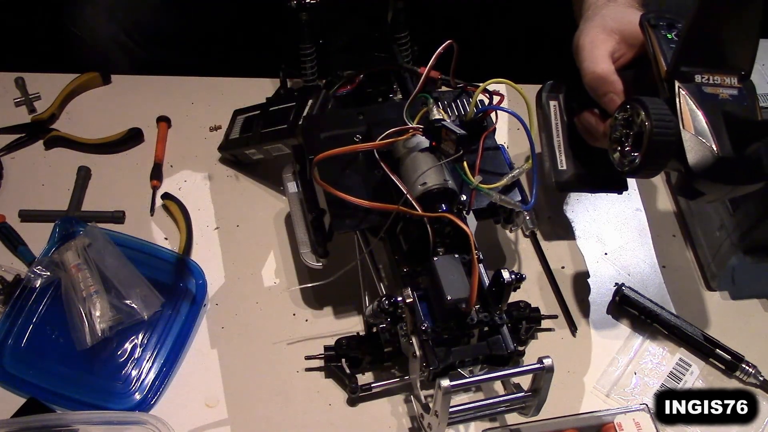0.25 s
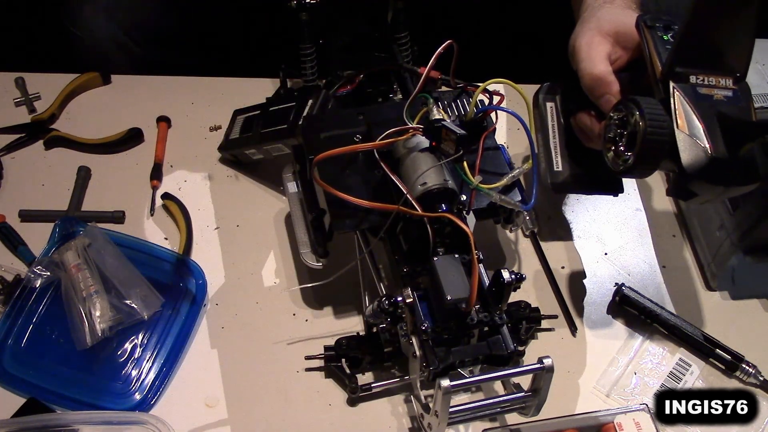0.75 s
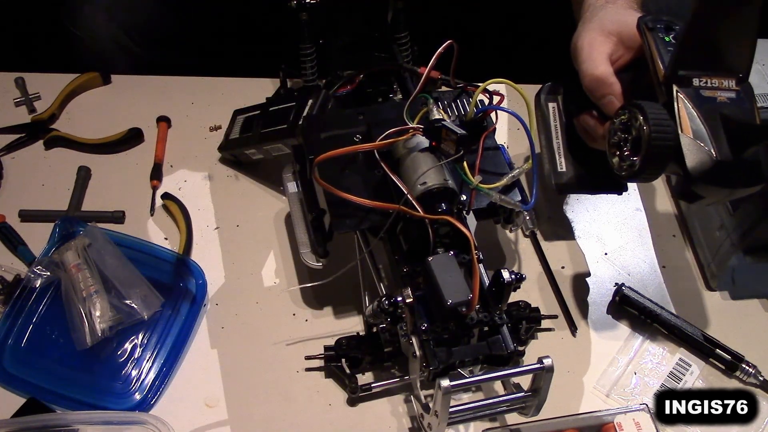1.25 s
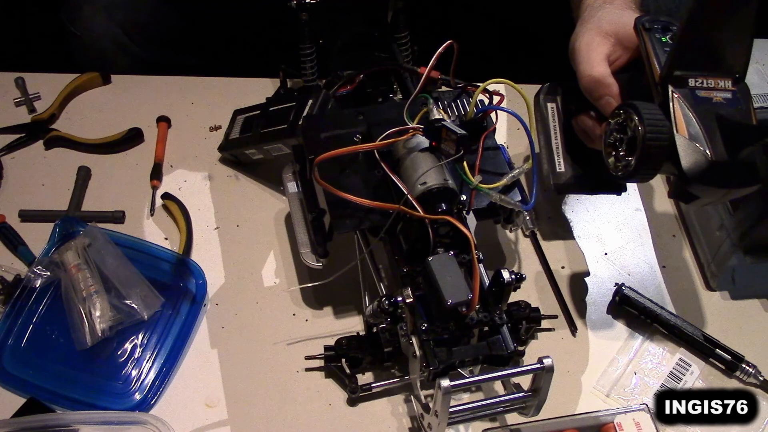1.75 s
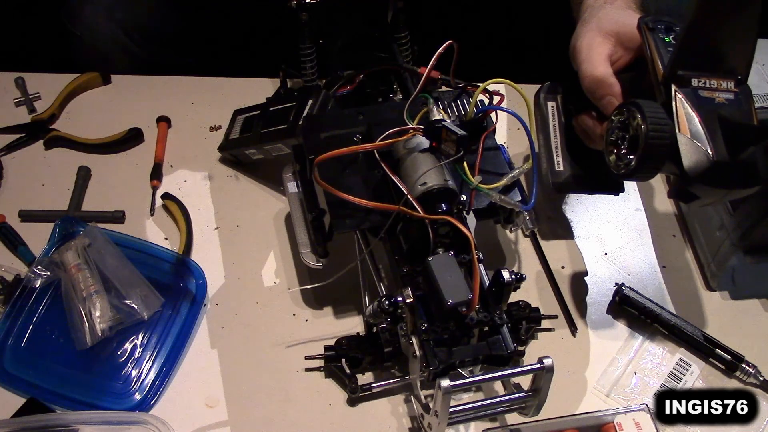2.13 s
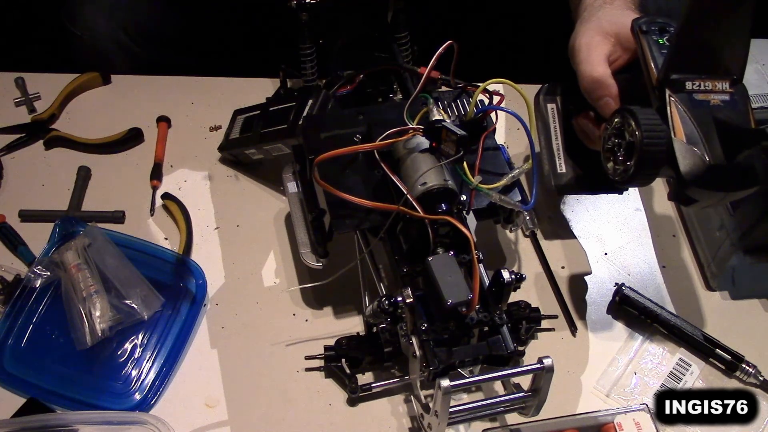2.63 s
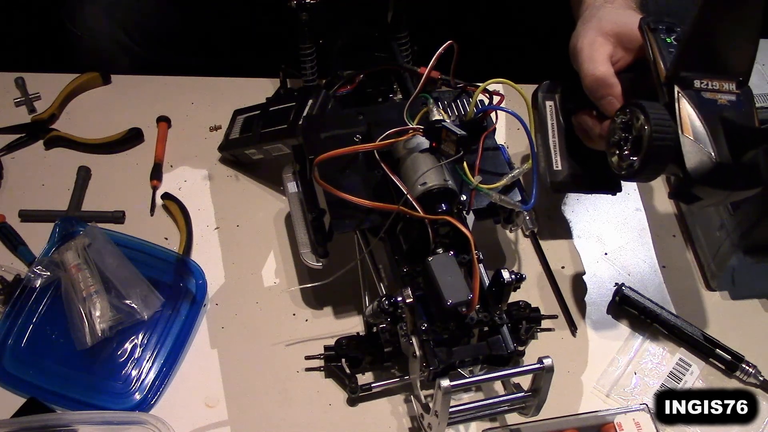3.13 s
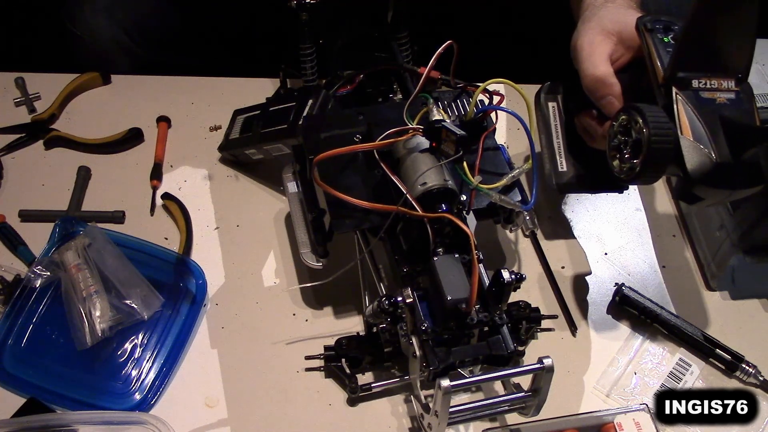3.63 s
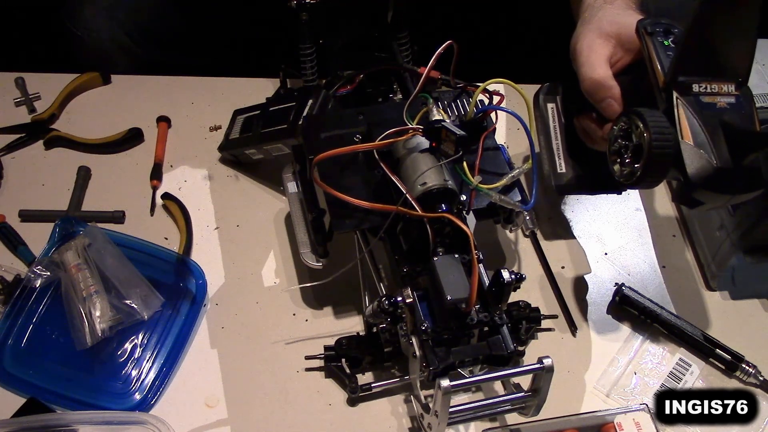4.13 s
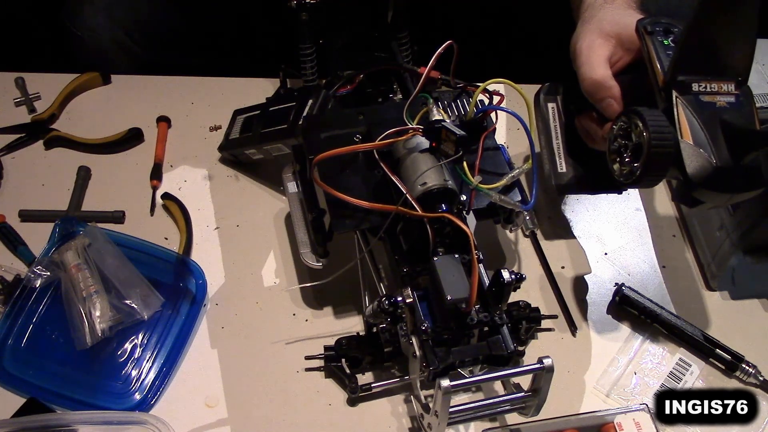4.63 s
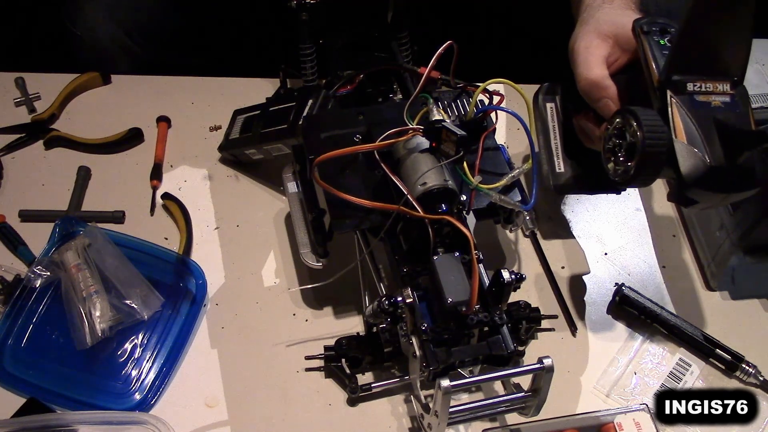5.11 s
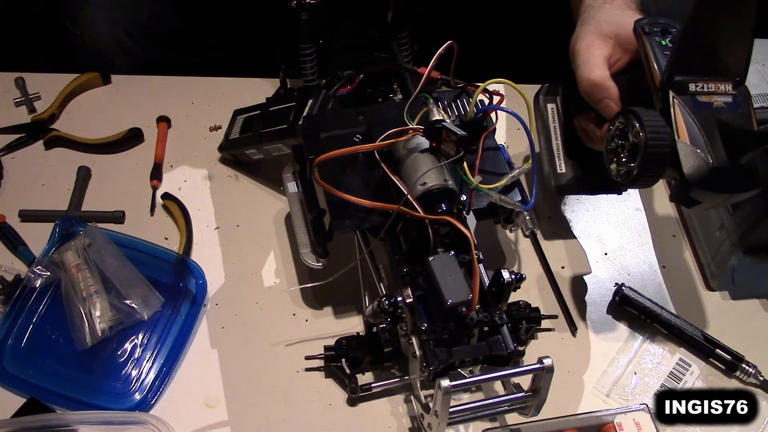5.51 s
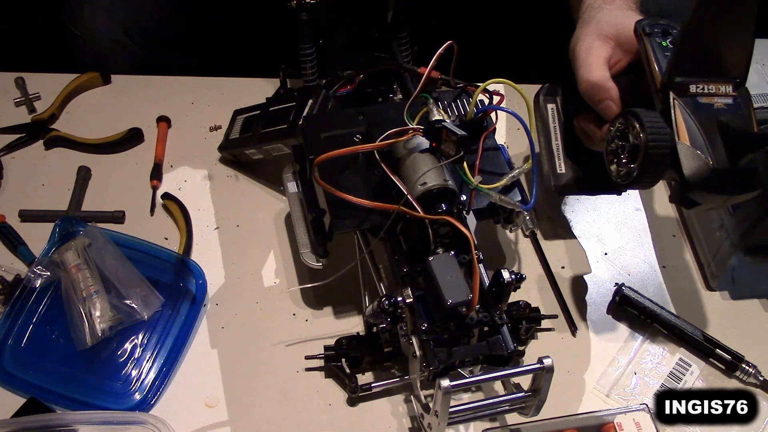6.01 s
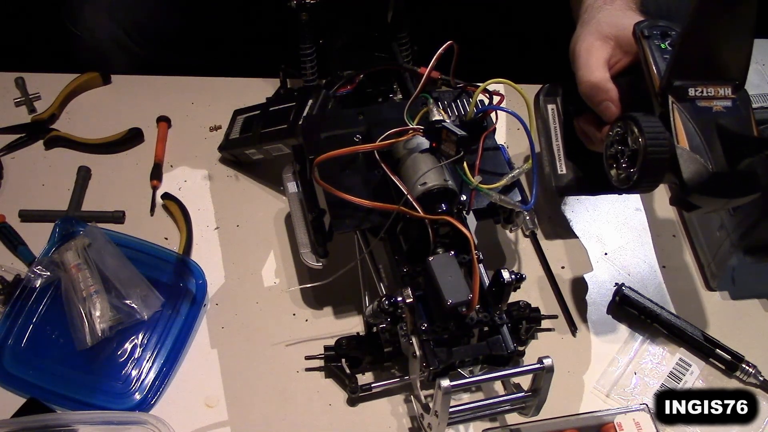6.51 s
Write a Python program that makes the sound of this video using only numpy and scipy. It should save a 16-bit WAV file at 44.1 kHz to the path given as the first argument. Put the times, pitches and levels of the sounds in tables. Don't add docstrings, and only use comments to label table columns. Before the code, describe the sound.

Close on a workbench in a small room, a model truck's servo ends a stroke, then buzzes faintly. A switch snaps and releases, the servo whines briefly, and the drive motor rattles its gearbox in a harsh burst that coasts down. The pattern comes twice more with shorter bursts, the last one doubled. Quiet room air stays underneath.

```python
import sys
import numpy as np
from scipy import signal
from scipy.fft import rfft, irfft, next_fast_len
from scipy.io import wavfile
from scipy.ndimage import uniform_filter1d

SR = 44100
rng = np.random.default_rng(int(sys.argv[2]) if len(sys.argv) > 2 else 0)


def materialize(psi):
    bounded = np.clip(np.atleast_2d(psi).T, -1, 1)
    quanta = np.round(bounded * 32767).astype(np.int16)
    wavfile.write(sys.argv[1], SR, quanta)


def voltage_ratio(decibels):
    exponent = np.asarray(decibels, float) / 20
    return 10 ** exponent


N = 297763

# time_s, level_db
DRIVE_BURSTS = [
    [(2.11, -63.5), (2.118, -30), (2.152, -33), (2.174, -14.5), (2.27, -23), (2.544, -25), (2.712, -31),
     (2.77, -36), (2.95, -98)],
    [(3.99, -71), (4.004, -32), (4.032, -41), (4.072, -19.5), (4.158, -22.5), (4.236, -27), (4.344, -38.5),
     (4.42, -74)],
    [(5.6, -63), (5.622, -30), (5.634, -41.5), (5.698, -25), (5.84, -26.5), (5.97, -32.5), (6.06, -46.5),
     (6.09, -99)],
    [(6.1, -49), (6.122, -39), (6.17, -25), (6.258, -23), (6.55, -30), (6.592, -37), (6.666, -39),
     (6.75, -98)],
]
# start_s, length_s, level_db
CHOPPER = [(2.122, .028, -33), (4.008, .002, -40), (4.08, .04, -36), (5.625, .11, -35), (6.115, .14, -33)]
# start_s, length_s, level_db
COAST = [
    (2.71, .12, -45),
    (4.24, .12, -43),
    (5.93, .1, -38),
    (6.575, .07, -38.5),
]
# start_s, length_s, level_db
BACKLASH = [
    (2.79, 0.0024, -30),
    (5.98, 0.0029, -28.5),
    (6.62, 0.012, -30.5),
]
# freq_hz, width_hz, boost_db
GEARBOX = [(1143, 117, 8.9), (1625, 99, 14.6), (2415, 226, 8.8), (2878, 90, 6.2), (3510, 130, 5.6),
           (4670, 910, 4.9), (7970, 340, 3.7), (10050, 850, 5.6), (12100, 450, 10.7)]
# freq_hz, width_hz, boost_db
COVER_PEAKS = [(953, 39, 7), (1166, 12, 4.5), (2834, 23, 8), (3110, 57, 6.5), (4080, 100, 2)]
# freq_hz, width_hz, boost_db
CHASSIS = [(154.7, 33, 12.5), (228, 14, 5), (365, 10, 10.5), (543, 10, 8.5), (721, 20, 6)]
# freq_hz, density_db
RATTLE = [(470, -25), (800, -9), (1170, -3), (1290, -4.5), (1640, -10), (2040, -4), (2420, -3.5), (4100, 2),
          (7000, -13.5), (9100, -12.5), (15400, -120)]
HISS = [(3240, -12), (5500, 0), (7550, -8), (10100, -2), (12400, -13.5), (13400, -21), (15100, -10.5),
        (16000, -56)]
RUMBLE = [(35, -69.5), (60, -39.5), (216, 0.5), (292, -3), (364, 4), (423, -3), (533, 3), (950, -7.5),
          (1240, -61), (2090, -120)]
FREEWHEEL = [(300, -42), (500, -11.5), (900, -6.5), (1500, -8), (2200, -32), (4000, -73.5)]
# time_s, peak_db
BLOWS = [(2.172, -18), (2.184, -13), (2.198, -17), (2.233, -17), (2.256, -12), (2.304, -17), (2.338, -16),
         (4.072, -9.5), (4.086, -8), (4.097, -23), (4.106, -19), (4.124, -8), (4.153, -14), (4.172, -21),
         (4.211, -12), (6.182, -21), (6.208, -13), (6.222, -12), (6.246, -13), (6.301, -26), (6.354, -21)]
# freq_hz, level_db, t60_s
COVER_MODES = [(2720, 0.5, 0.027), (2880, -3.5, .025), (3504, 1.5, 0.039), (3880, -6, .025),
               (4370, -10.5, .02)]

# time_s, level_db
SERVO_STROKES = [
    [(0.0, -10.5), (0.042, -34.5), (0.09, -41.5), (0.16, -75)],
    [(0.92, -25), (0.95, -29.5), (0.98, -40), (1.004, -44), (1.078, -38.5), (1.114, -33), (1.216, -26),
     (1.244, -29.5), (1.36, -63)],
    [(3.315, -39), (3.338, -20.5), (3.379, -22), (3.397, -38), (3.499, -31), (3.635, -28), (3.691, -39.5),
     (3.76, -87)],
    [(4.996, -38), (5.03, -28.5), (5.06, -41), (5.084, -44), (5.194, -30.5), (5.244, -31.5), (5.306, -28),
     (5.382, -45), (5.46, -64)],
]
# start_s, braking_s, braking_power, throb_peak_s, throb_depth (0-1)
SHAFT_STROKES = [
    (-.33, .345, 5, .01, .5),
    (.92, .286, 7.5, 1.14, .3),
    (3.33, .33, 4.3, 3.455, 1),
    (5.0, .316, 6, 5.238, .7),
]
# start_s, length_s, level_db
JOLTS = [(0, .005, -25), (1.108, .008, -35), (1.2, .02, -37), (3.397, .01, -30), (3.62, .015, -38),
         (5.185, .01, -37), (5.265, .03, -32)]
# start_s, length_s, level_db
WHINES = [
    (1.115, .04, -39),
    (3.42, .07, -40.5),
    (3.5, .08, -43.5),
    (5.222, .06, -35.5),
]
OVERTONE_WHINES = [
    (1.14, .01, -46),
    (3.42, .07, -39),
    (3.5, .07, -42),
    (5.2, .08, -60),
]
SWEEPS = [
    (1.16, .03, -50),
    (1.2, 0.02, -37.5),
    (3.35, .03, -42),
    (5.28, 0.032, -46),
]
# start_s, length_s, level_db
BRUSHES = [
    (.97, .04, -64),
    (3.4, .2, -60),
    (5.05, .04, -62),
]
# start_s, length_s, extra_db
SPEED_RASP = [(0, .02, -5), (.93, .03, 1), (1.15, 0.084, 10.5), (3.33, .05, -2), (3.6, 0.056, 2.5),
              (5.01, .03, -2), (5.25, 0.11, 11.5)]
# start_s, length_s, level_db
SING = [
    (1.2, .045, -45),
    (3.336, .048, -31),
    (3.52, .08, -46),
    (5.285, .045, -42),
]
# start_s, length_s, level_db
GROAN = [
    (0, 0.046, -38),
    (1.215, 0.038, -38),
    (3.61, .06, -40.5),
    (5.3, 0.047, -42.5),
]
# after_start_s, length_s, level_db
SCUFFS = [(0.023, .002, -45), (0.03, 0.0034, -43), (0.038, 0.0024, -48), (0.04, 0.0015, -53),
          (.058, .006, -43.5), (0.065, 0.0029, -34)]
SCUFF_STARTS_S = (.908, 4.989)
# mesh overtones, commutator slots; then level_db of each
OVERTONES = (20, 30, 40)
SLOTS = (39, 42, 45, 47, 51, 54, 57, 60)
OVERTONE_DB = (-2, 4, -2)
SLOT_DB = (-2, 0, -3, -1, -2, -6, -5, -10)
# freq_hz, density_db
GRIND = [(530, -65), (900, 0), (1810, -3.5), (2360, 0), (2730, -1.5), (4200, 0.5), (6030, -2.5),
         (7310, 5.5), (14400, -13), (16000, -7)]
SCUFF = [(2000, -5), (3400, 3), (5500, -18), (7500, -4.5), (9500, -12), (11000, 2.5), (12600, -11),
         (14000, -25)]
THRUM = [(50, -37), (100, -18), (150, 3), (200, 2.5), (300, -24), (600, -70)]
# freq_hz, width_hz, boost_db
SERVO_CASE = [(2240, 40, 5.5), (3350, 590, 6.9), (4470, 150, 4.3), (7200, 600, 2.6), (9200, 880, 1.4),
              (10550, 1000, 4)]

# time_s, buzz_db, strain_db, tick_db
HOLD = [(0, -64, -74, -70), (.36, -69, -62, -80), (.45, -57, -71, -66.5), (.9, -58.5, -68, -69),
        (1.3, -59, -45, -60), (1.65, -84, -51.5, -65.5), (2.1, -57, -51, -73), (2.9, -86, -61.5, -75),
        (3.9, -64, -66, -70), (4.4, -58.5, -84, -66), (5.0, -59, -71, -67), (5.4, -72, -49, -57.5),
        (6.75, -59, -59, -71)]
# freq_hz, level_db, t60_s
BUZZ = [(900, -7, .04), (1590, 1, .05), (1740, 0, .045), (1880, .5, .05), (3600, -12, .012),
        (4500, -14, .012)]
STRAIN = [(366, -2, .1), (900, -7, .02), (1620, -1, .035), (2280, -6, .026), (3500, -9, .01),
          (4500, -11, .008)]
SPARK = [(3550, -3, .006), (4450, -1.5, .007), (5300, -6, .005), (7200, -6, .005), (8100, -4, .005),
         (9300, -8, .004)]

# time_s, peak_db, knock_db (near 1 kHz), tick_db (above 6 kHz)
CLICKS = [
    (0.757, -4.5, -20, -24.5),
    (0.9124, -20, -19, -28.5),
    (1.102, -32, -36.5, -50),
    (3.1541, -3.5, -24, -24),
    (3.306, -19.5, -22, -33),
    (4.813, -5, -21.5, -22.5),
    (4.989, -23, -17, -36),
    (5.183, -41, -29, -42),
    (5.264, -32, -33.5, -45),
]
# time_s, peak_db, knock_db, tick_db
DOGS = [(1.038, -25, -40, -50), (3.5035, -20, -38, -31), (5.1393, -20, -34, -29), (2.1205, -18, -26, -43),
        (2.1415, -26, -25, -55), (2.1513, 8.5, -35, -2.5), (2.4237, -20, -36, -30), (2.4746, -21, -34, -31),
        (2.6018, -14, -36, -28), (2.7877, -34, -46, -50), (4.0067, -33.5, -45.5, -38.5),
        (4.0528, -17, -16, -48), (4.0708, -16, -22, -45), (5.62, -32, -35, -36.5), (5.6698, -21, -23, -43),
        (5.6942, -7, -20, -37), (5.9776, -28, -21, -45), (6.116, -24, -26, -32.5), (6.1337, -25, -29, -46),
        (6.1592, -11, -18, -38)]
# time_s, peak_db
CREAKS = [(0.192, -46), (0.267, -44), (0.3745, -46), (1.6405, -37), (1.695, -43), (1.8456, -41),
          (1.8612, -39), (3.765, -49), (3.8194, -46), (3.908, -47), (4.5794, -52), (4.6244, -46),
          (4.6633, -46), (4.7696, -46)]
# freq_hz, level_db, t60_s
SNAP = [(1900, -15, 0.013), (2500, -9, 0.012), (2950, -6, 0.012), (3230, -3.5, 0.017), (3840, -1.5, .013),
        (4060, -6, 0.012), (4460, -8, .012), (4970, -12, 0.0098), (5570, -13, .007)]
CLUTCH = [(1586, -12, 0.025), (2520, -6, 0.018), (3080, 0, 0.0071), (3370, -3, 0.015), (4770, -13, 0.0094),
          (5260, -11, 0.0098), (5518, -26, .01)]
KNOCK = [(730, -8, 0.0088), (1055, -2.5, 0.015), (1148, 1, 0.015), (1340, -9.5, 0.015),
         (1420, -11.5, 0.016)]
TICK = [(6140, -3, 0.0042), (6970, 0, 0.0051), (8060, 0.5, 0.007), (8360, -4, 0.0075), (9300, -6.5, 0.0078),
        (11100, -5, 0.0027), (12830, -13, 0.0088), (14000, -21, .006)]
CRACK = [(1110, -8.5, 0.0037), (3220, 0, 0.0018), (6860, -3, 0.0007)]

# freq_hz, level_db, t60_s
ROOM = [(564, -12.5, 0.43), (1520, -10.5, 0.2), (3190, -12, 0.32), (6900, -16.5, 0.27), (12000, -29, 0.078)]
# freq_hz, density_db
AIR = [(15, -68), (25, -41), (157, -9.5), (301, -7.5), (427, -5.5), (503, -6), (545, -1.5), (714, -8),
       (840, -2), (1100, -7), (1560, -12), (5000, -26.5), (10100, -33.5), (16000, -41)]
AIR_SIDE = [(15, -46), (25, -25), (231, -5.5), (425, -8), (632, -12), (2940, -23), (4480, -25), (5540, -29),
            (14000, -44)]
# freq_hz, level_db
SIDE_LEVEL = [(60, -35.5), (300, -65), (1000, -61.5), (2000, -30), (3800, -26), (4600, -17), (5500, -25.5),
              (11500, -26.5), (12300, -14), (13000, -15), (15000, -32)]

CHOPPER_HZ, COAST_FROM_HZ, COAST_TO_HZ, COAST_LINGERS_S = 1007, 780, 380, .03
CRUISE_DB = -25
HISS_DB, HISS_FOLLOWS, HISS_TOP_DB = -31, 1.92, -28.5
RUMBLE_UNDER_DB, IDLE_RUMBLE_DB, IDLE_FOLLOWS = -8.5, -43.5, .15
FREEWHEEL_DB, FREEWHEEL_FOLLOWS = -35.5, .37
SPIN_UP_S, SPIN_UP_SHARE, BRAKE_HZ, TOP_HZ, CRAWL_HZ = .034, .45, 78, 256, 120
TEETH, GEAR_RATIO, SING_HZ, GROAN_HZ, GROAN_WIDTH_HZ = 10, 6.2, 2216, 3600, 490
STROKE_DB = -26
RASP_DB, RASP_FOLLOWS, SHAKE_DB, SHAKE_FOLLOWS = -48, .91, -48, .6
WHINE_RISE_DB_S, WHINE_FALL_DB_S, WHINE_FLOOR_DB = 330, 350, -68
HUM_DB, HUM_JOLT_DB, HUM_WAVER_DB, THRUM_DB = -48.5, -13, 1.8, -49.5
PULSE_HZ, PULSE_LAG_CYCLES, STRAIN_LAG_CYCLES = 54.627, .5, .33
CREAK_SNAP_DB, CREAK_KNOCK_DB, CREAK_TICK_DB = 2.5, -6, -11
AIR_DB, MIC_LOW_HZ, MIC_HIGH_HZ = -49.5, 100, 15900
DROPOUT_S, DROPOUT_RECOVER_S = .781, .007


def drive_motor():
    gate, effort_db = in_bursts(DRIVE_BURSTS)
    rattle = np.maximum(voltage_ratio(effort_db), held(BACKLASH, 500, 592))
    swing_db = 20 * np.log10(rattle) - CRUISE_DB
    hiss = voltage_ratio(np.minimum(HISS_DB + HISS_FOLLOWS * swing_db, HISS_TOP_DB))
    rumble = voltage_ratio(effort_db + RUMBLE_UNDER_DB) + voltage_ratio(IDLE_RUMBLE_DB + IDLE_FOLLOWS * swing_db)
    freewheel = voltage_ratio(FREEWHEEL_DB + FREEWHEEL_FOLLOWS * swing_db)
    uneven = gate * voltage_ratio(.8 * drift(30))

    teeth = contacts(4000, 2.1, 1.5, 120)
    out = played(teeth, uneven * rattle, RATTLE, GEARBOX[:6] + COVER_PEAKS, patchy_db=2.5)
    out += played(contacts(1500, .6, 1, 27.7), uneven * rumble, RUMBLE, CHASSIS)
    out += played(contacts(7000, 1, 2.5, 170), uneven * hiss, HISS, GEARBOX[6:])
    out += played(contacts(1200, 2.3, .69, 40), gate * freewheel, FREEWHEEL, GEARBOX[:1])

    chop = held(CHOPPER, 900, 200) * voltage_ratio(2.5 * drift(35))
    out += gate * chop * sine(CHOPPER_HZ * (1 + .012 * drift(40)))

    glide = []
    for s, length, _ in COAST:
        glide += [(s, COAST_FROM_HZ), (s + length, COAST_TO_HZ), (s + 2 * length, COAST_TO_HZ)]
    mesh_hz, = in_time(glide)
    mesh = held([(s, length + COAST_LINGERS_S, db) for s, length, db in COAST], 1000, 400)
    return out + mesh * voltage_ratio(3 * drift(35)) * sine(mesh_hz * (1 + .045 * drift(50)))


def tooth_blows():
    s, db = np.transpose(BLOWS)
    after, out = np.arange(200), 0
    scrape = rng.standard_normal((len(s), len(after))) * np.exp(-after / SR / .0012)
    strengths_db = rng.normal(0, 3, (len(s), len(COVER_MODES)))
    for k, mode in enumerate(COVER_MODES):
        blows = np.zeros(N)
        blows[(s[:, None] * SR).astype(int) + after] = voltage_ratio(db + strengths_db[:, k] - 24)[:, None] * scrape
        out = out + ring(blows, [mode])
    return out


def servo():
    gate, grind_db = in_bursts(SERVO_STROKES)
    swing_db = grind_db - STROKE_DB
    turns_hz, throb = shaft()
    running = np.clip((turns_hz - CRAWL_HZ) / BRAKE_HZ, 0, 1)
    jolts = held(JOLTS, 1500, 600)

    shaky_hz = turns_hz * (1 + .0107 * drift(136))
    loaded = voltage_ratio(WHINE_FLOOR_DB) + held(WHINES, WHINE_RISE_DB_S, WHINE_FALL_DB_S)
    bright = voltage_ratio(WHINE_FLOOR_DB) + held(OVERTONE_WHINES, WHINE_RISE_DB_S, WHINE_FALL_DB_S)
    whine = loaded * (.06 + throb) * (1 + .45 * drift(90)) * sine(TEETH * shaky_hz)
    overtones = sum(voltage_ratio(db + 3.5 * drift(25)) * sine(k * shaky_hz) for k, db in zip(OVERTONES, OVERTONE_DB))
    whine += bright * throb * overtones

    smeared = [(17, -10), (20, .5), (23, -11), (30, -10), (44, -16)]
    rasp = sum(voltage_ratio(db) * drift(110) * sine(k * turns_hz) for k, db in smeared)
    rasp *= voltage_ratio(RASP_DB + RASP_FOLLOWS * swing_db) * np.maximum(held(SPEED_RASP, 400, 400), 1)

    wavering_hz = turns_hz * (1 + .003 * drift(60))
    brush = sum(voltage_ratio(db + 4 * drift(40)) * sine(k * wavering_hz) for k, db in zip(SLOTS, SLOT_DB))
    brush *= held(BRUSHES, 300, 50)
    hum = (voltage_ratio(HUM_DB) + voltage_ratio(HUM_JOLT_DB) * jolts) * voltage_ratio(HUM_WAVER_DB * drift(60)) * sine(turns_hz)
    out = gate * (running * (hum + brush + whine) + rasp)

    out += held(SING, 1500, 700) * voltage_ratio(-3) * drift(80) * sine(SING_HZ)
    out += held(GROAN, 250, 270) * drift(GROAN_WIDTH_HZ) * sine(GROAN_HZ)
    out += held(SWEEPS, 500, 700) * (1 + .6 * drift(90)) * sine(OVERTONES[0] * shaky_hz)

    teeth = contacts(9000, 2.1, .8, 80)
    out += played(teeth, gate * voltage_ratio(grind_db - 6) * (.98 + .13 * throb), GRIND, SERVO_CASE)
    scuffs = [(start + s, length, db) for start in SCUFF_STARTS_S for s, length, db in SCUFFS]
    out += played(teeth, held(scuffs, 5000, 5000), SCUFF, ())

    shake = voltage_ratio(SHAKE_DB + SHAKE_FOLLOWS * swing_db) + voltage_ratio(-1) * jolts
    out += played(contacts(800, 3, 1.5, 25), gate * voltage_ratio(-3) * shake, RUMBLE, CHASSIS)
    return out + played(rng.standard_normal(N), gate * running * voltage_ratio(THRUM_DB), THRUM, ())


def shaft():
    rows, t = np.array(SHAFT_STROKES), np.arange(N) / SR
    start, brake, power, peak_s, depth = rows[np.searchsorted(rows[:, 0], t) - 1].T
    age = t - start
    turns_hz = TOP_HZ * (1 - SPIN_UP_SHARE * np.exp(-age / SPIN_UP_S)) - BRAKE_HZ * (age / brake) ** power
    turns_hz = uniform_filter1d(np.maximum(turns_hz, CRAWL_HZ), size=1200)
    next_gear = np.cumsum(turns_hz / GEAR_RATIO) / SR
    from_peak = next_gear - next_gear[(peak_s * SR).astype(int)]
    return turns_hz, .6 * (1 - depth) + depth * np.cos(np.pi * from_peak) ** 6


def servo_hold():
    buzz_db, strain_db, spark_db = in_time(HOLD)
    cycle = np.arange(N + 1) * PULSE_HZ / SR + 1 - PULSE_LAG_CYCLES
    pulses = np.diff(np.floor(cycle))
    late = cycle[:-1] - STRAIN_LAG_CYCLES
    force = voltage_ratio(rng.uniform(-3, 3, (int(cycle[-1]) + 1, 2)))
    scuffs = force[late.astype(int), 0] * np.exp(-4.5 * (late % 1)) * rng.standard_normal(N)
    nudge = np.where(strain_db > buzz_db, late, cycle[:-1])
    ticks = force[nudge.astype(int), 1] * np.exp(-3.8 * (nudge % 1)) * rng.standard_normal(N)
    out = voltage_ratio(buzz_db) * rms_one(ring(pulses, BUZZ))
    out += voltage_ratio(strain_db) * rms_one(ring(scuffs, STRAIN))
    out += voltage_ratio(spark_db) * rms_one(ring(ticks, SPARK))
    return signal.sosfilt(signal.butter(2, 250, "high", fs=SR, output="sos"), out)


def clicks(table, snap):
    out, rows, after = 0, np.array(table), np.arange(220)
    chatter = rng.standard_normal((len(rows), len(after))) * np.exp(-after / SR / .00098)
    contact = .17 * chatter + .22 * (after == 0) + .6 * (after == 58) + .16 * (after == 135)
    at = (rows[:, :1] * SR).astype(int) + after
    for column, modes, trim_db in [(1, snap, -6), (2, KNOCK, 5.5), (3, TICK, 0)]:
        blows = np.zeros(N)
        blows[at] = voltage_ratio(rows[:, column, None] + trim_db) * contact
        out = out + ring(blows, modes)
    crack = np.zeros(N)
    crack[at[:, 0]] = voltage_ratio(rows[:, 1] + .5)
    band = signal.butter(4, [750, 14500], "band", fs=SR, output="sos")
    return signal.sosfilt(band, [out, ring(crack, CRACK)])


def room(x):
    t, tails = np.arange(SR // 2) / SR, 0
    for hz, level_db, t60 in ROOM:
        band = signal.butter(2, [hz / 1.6, min(hz * 1.5, .45 * SR)], "band", fs=SR, output="sos")
        noise = signal.sosfilt(band, rng.standard_normal((2, len(t))))
        tails = tails + noise * voltage_ratio(level_db - 60 * t / t60)
    tails = tails * np.clip(t / .00077, 0, 1) * voltage_ratio(-22.5)
    return signal.fftconvolve(x[None], tails, axes=1)[:, :N]


def room_air():
    air = rms_one(colour(contacts(40000, .102, .79, 9.1), AIR, CHASSIS[1:4]))
    side = rms_one(colour(rng.standard_normal(N), AIR_SIDE))
    return voltage_ratio(AIR_DB) * air, voltage_ratio(AIR_DB - 14) * side


def contacts(per_s, spread_db, lumps_db, lumps_per_s):
    sizes = voltage_ratio(spread_db * np.minimum(rng.exponential(1, N), 5)) * rng.choice([-1, 1], N)
    return rms_one(sizes * (rng.random(N) < per_s / SR)) * voltage_ratio(lumps_db * drift(lumps_per_s))


def played(excitation, envelope, spectrum, peaks, patchy_db=0):
    shaped = colour(excitation * envelope, spectrum, peaks, patchy_db)
    return shaped / np.std(colour(excitation, spectrum, peaks))


def colour(x, spectrum, peaks=(), patchy_db=0):
    size = next_fast_len(N, True)
    hz = np.maximum(np.fft.rfftfreq(size, 1 / SR), 1)
    points = np.array(spectrum)
    gain = voltage_ratio(np.interp(np.log(hz), np.log(points[:, 0]), points[:, 1]))
    y = irfft(rfft(x, size) * gain, size)[:N]
    for peak_hz, width_hz, boost_db in peaks:
        r, w = np.exp(-np.pi * width_hz / SR), 2 * np.pi * peak_hz / SR
        tone = signal.lfilter([1 - r * r, 0, r * r - 1], [2, -4 * r * np.cos(w), 2 * r * r], y)
        wander_db = patchy_db * drift(18.4) if patchy_db else 0
        y = y + (voltage_ratio(boost_db + wander_db) - 1) * tone
    return y


def ring(strikes, modes):
    out = 0
    for k, (hz, level_db, t60) in enumerate(modes):
        r, w = voltage_ratio(-60 / (t60 * SR)), 2 * np.pi * hz / SR
        push = (-1) ** k * voltage_ratio(level_db) * np.sin(w)
        out = out + signal.lfilter([0, push], [1, -2 * r * np.cos(w), r * r], strikes + 1e-18)
    return out


def sine(hz):
    return np.sqrt(2) * np.sin(2 * np.pi * np.cumsum(hz * np.ones(N)) / SR)


def drift(rate_hz):
    r = np.exp(-16 * np.pi * rate_hz / SR)
    slow = signal.lfilter([1], [1, -2 * r, r * r], rng.standard_normal(N // 8 + 3002))[3000:]
    return np.interp(np.arange(N) / 8, np.arange(len(slow)), rms_one(slow))


def held(rows, rise_db_s, fall_db_s):
    t, levels_db = np.arange(N) / SR, []
    for s, length, db in rows:
        rise_db = rise_db_s * np.maximum(s - t, 0)
        fall_db = fall_db_s * np.maximum(t - s - length, 0)
        levels_db.append(db - rise_db - fall_db)
    return voltage_ratio(np.max(levels_db, axis=0))


def in_time(rows):
    s, *columns = np.transpose(rows)
    return [np.interp(np.arange(N) / SR, s, c) for c in columns]


def in_bursts(bursts):
    t = np.arange(N) / SR
    gate = sum(np.clip(np.minimum(t - b[0][0] + .001, b[-1][0] + .03 - t) / .03, 0, 1) for b in bursts)
    return gate, *in_time(np.concatenate(bursts))


def rms_one(x):
    return x / np.sqrt(np.mean(x ** 2) + 1e-20)


def scene():
    machine = drive_motor() + tooth_blows() + servo() + servo_hold()
    creaks = [(s, db + CREAK_SNAP_DB, db + CREAK_KNOCK_DB, db + CREAK_TICK_DB) for s, db in CREAKS]
    snaps, crack = clicks(CLICKS + creaks, SNAP) + clicks(DOGS, CLUTCH)
    wet, wet_side = room(voltage_ratio(-3) * machine + crack)
    air, air_side = room_air()
    low_cut = signal.butter(3, MIC_LOW_HZ, "high", fs=SR, output="sos")
    mid = signal.sosfilt(low_cut, machine + snaps + wet) + air
    direct_side = colour(np.roll(machine + snaps, shift=160), SIDE_LEVEL)
    side = voltage_ratio(-5) * direct_side + voltage_ratio(-44) * wet_side + air_side
    return np.array([mid + side, mid - side])


def low_pass(x):
    return signal.sosfilt(signal.butter(12, 16500, fs=SR, output="sos"), x)


def record(dry):
    since = np.arange(N) / SR - DROPOUT_S
    dry = dry * np.where(since < 0, 1, np.clip(since / DROPOUT_RECOVER_S, 0, 1) ** 2)
    top_cut = signal.cheby2(10, 50, MIC_HIGH_HZ * 1.012, fs=SR, output="sos")
    mix = signal.sosfilt(top_cut, np.clip(dry, -.78, .78))
    return low_pass(mix)


dry = scene()
out = record(dry)
materialize(out)
```